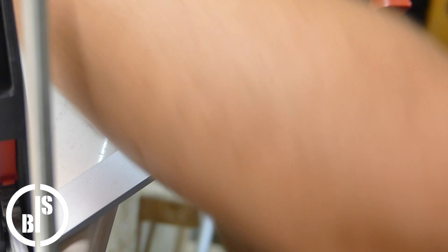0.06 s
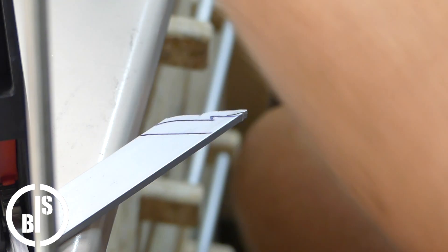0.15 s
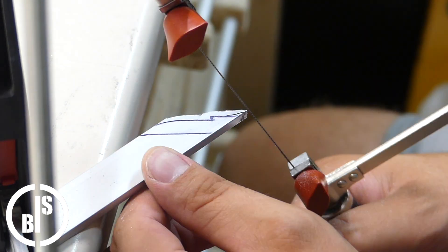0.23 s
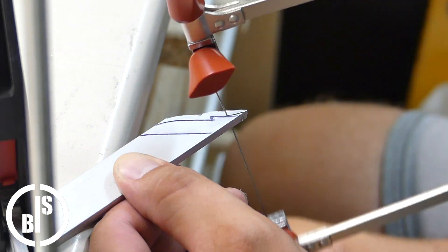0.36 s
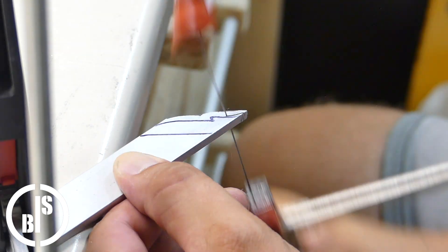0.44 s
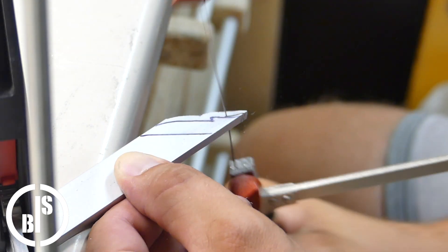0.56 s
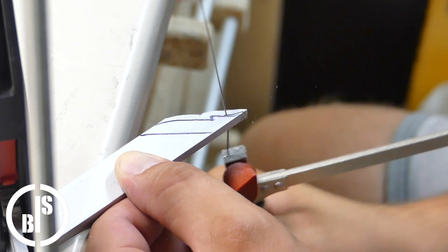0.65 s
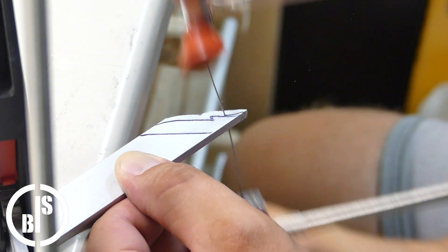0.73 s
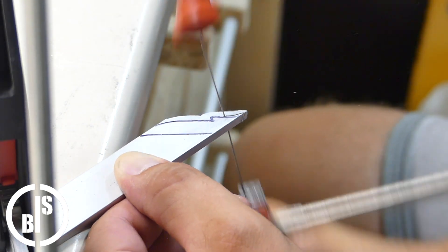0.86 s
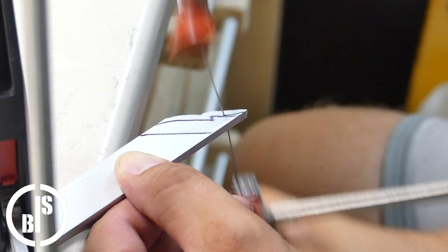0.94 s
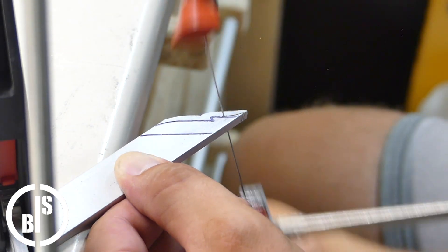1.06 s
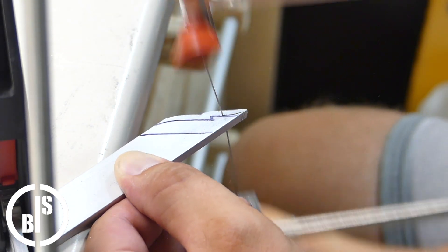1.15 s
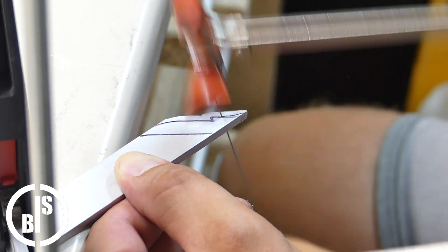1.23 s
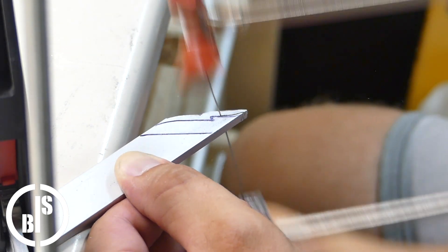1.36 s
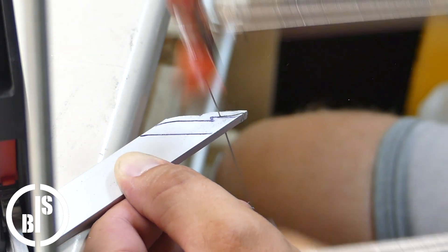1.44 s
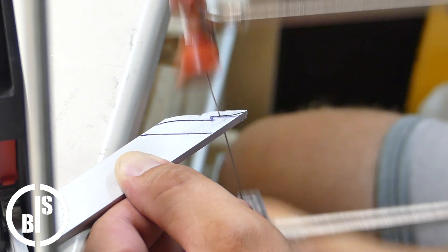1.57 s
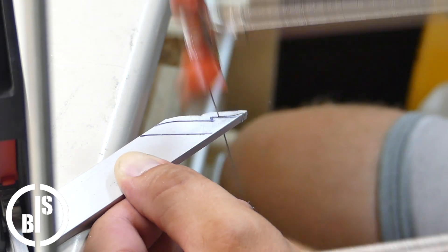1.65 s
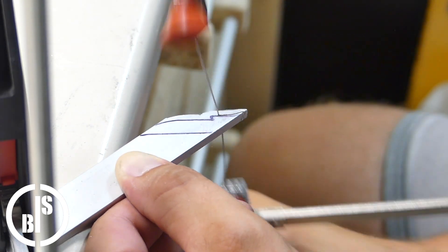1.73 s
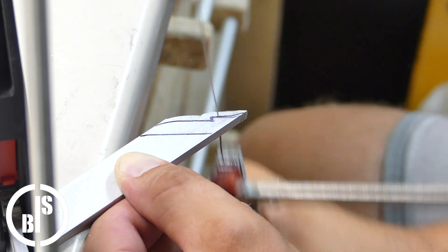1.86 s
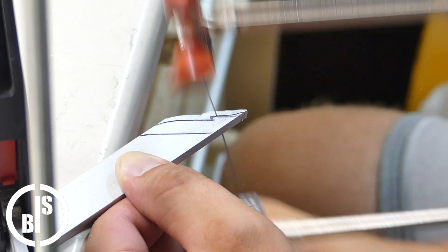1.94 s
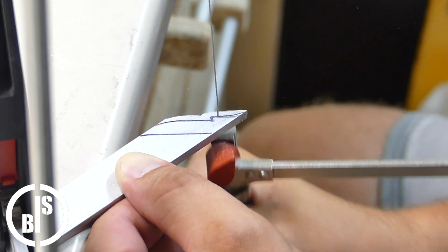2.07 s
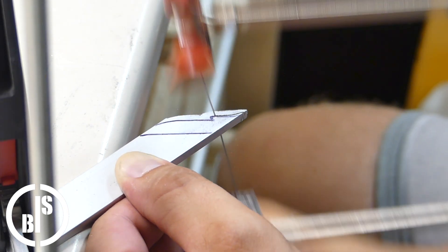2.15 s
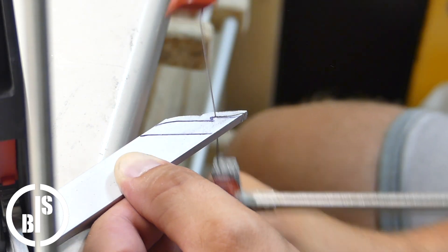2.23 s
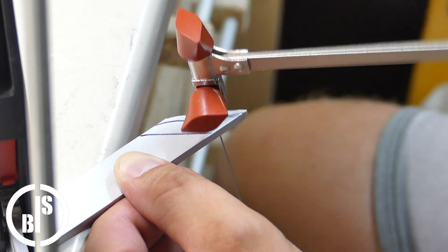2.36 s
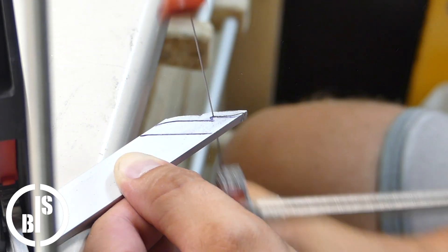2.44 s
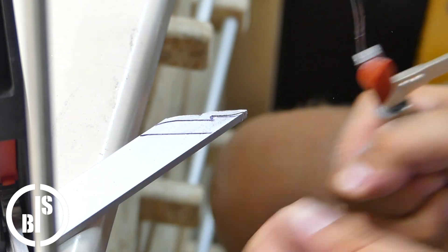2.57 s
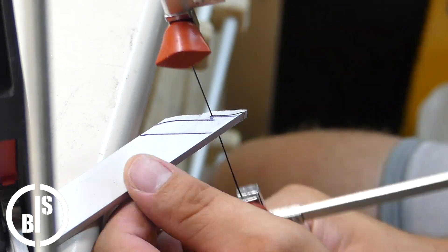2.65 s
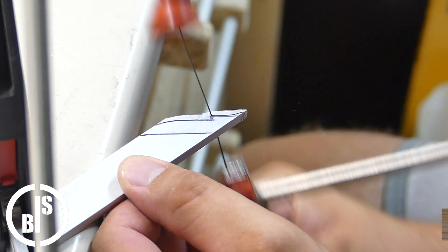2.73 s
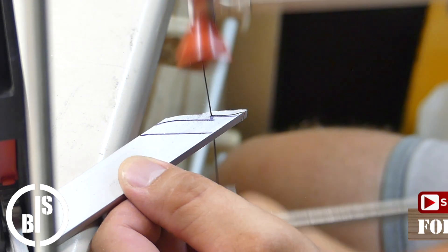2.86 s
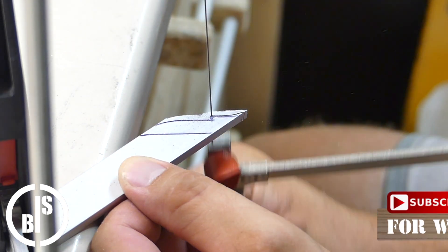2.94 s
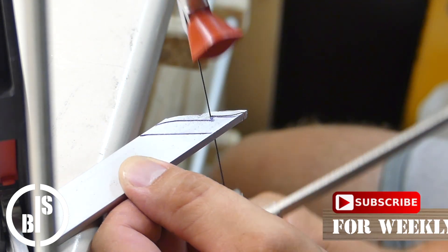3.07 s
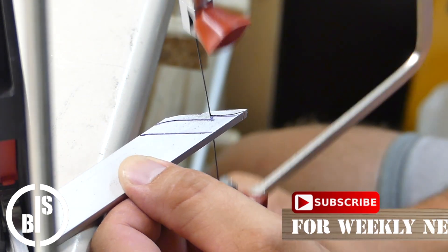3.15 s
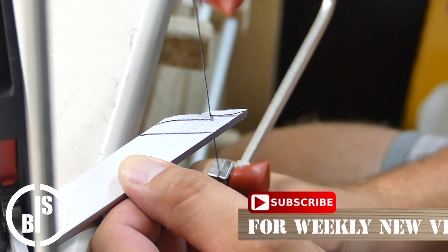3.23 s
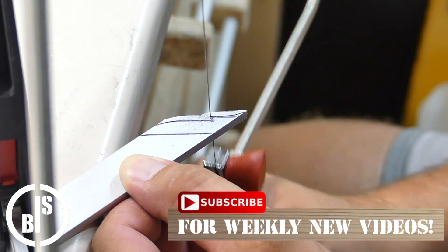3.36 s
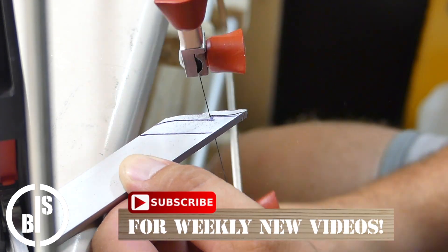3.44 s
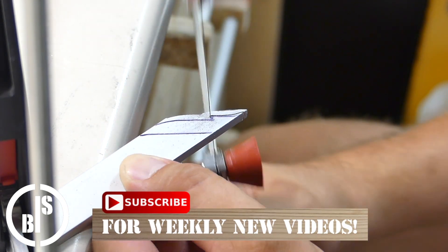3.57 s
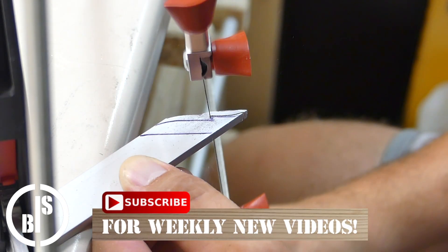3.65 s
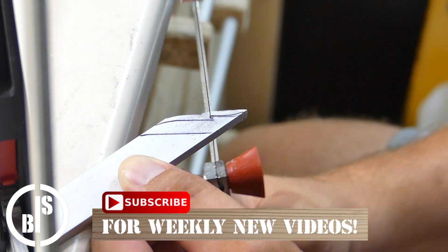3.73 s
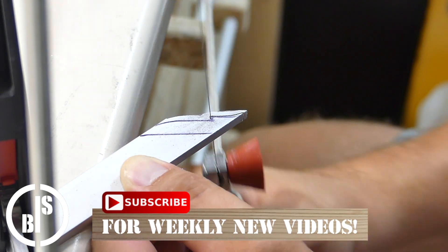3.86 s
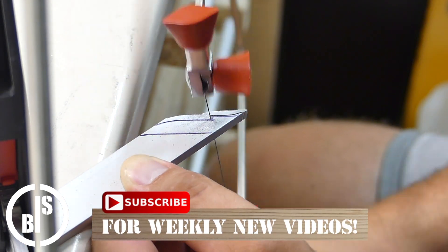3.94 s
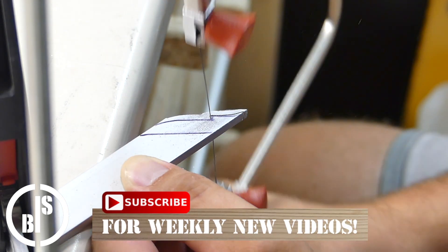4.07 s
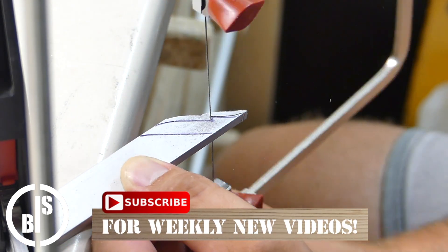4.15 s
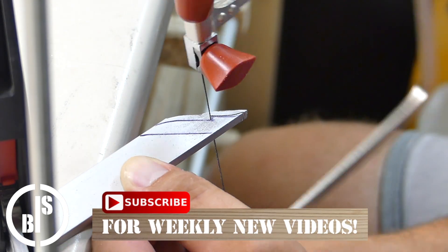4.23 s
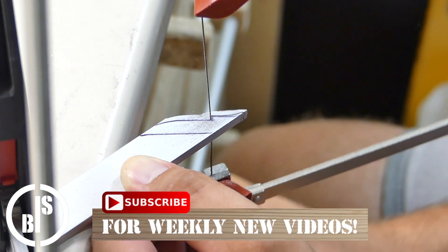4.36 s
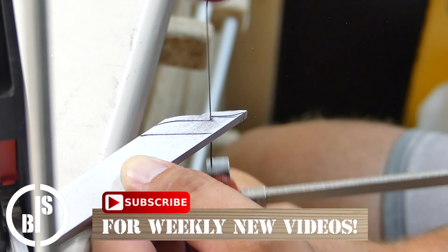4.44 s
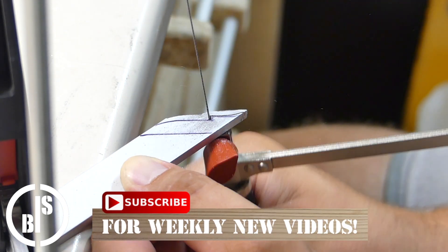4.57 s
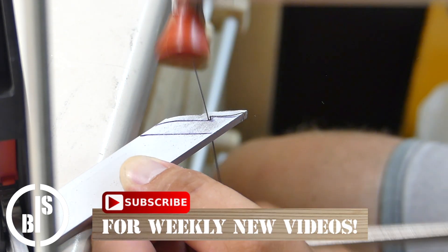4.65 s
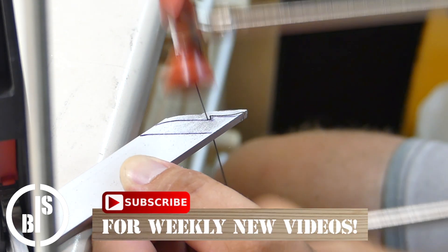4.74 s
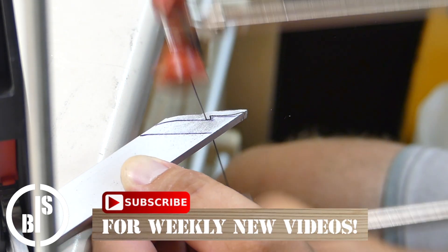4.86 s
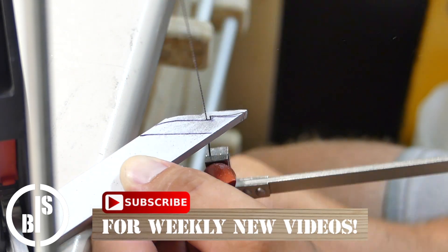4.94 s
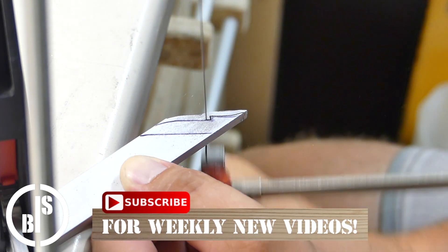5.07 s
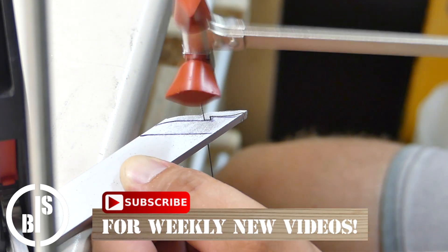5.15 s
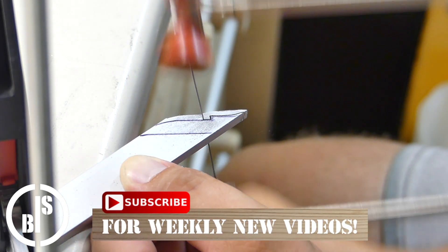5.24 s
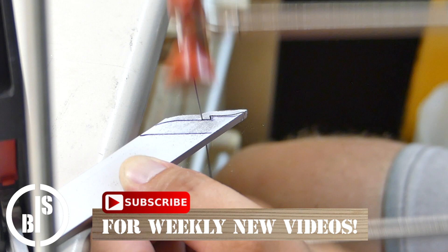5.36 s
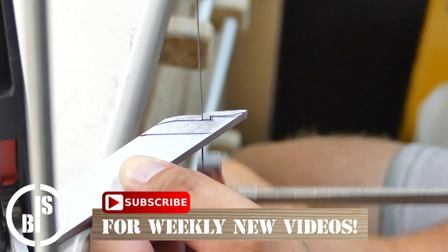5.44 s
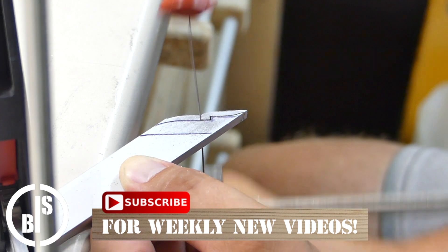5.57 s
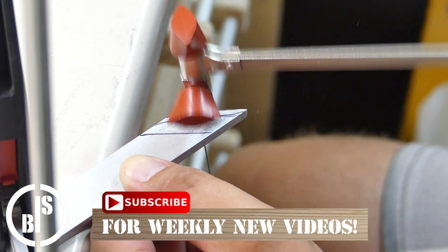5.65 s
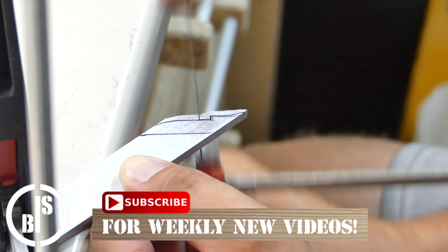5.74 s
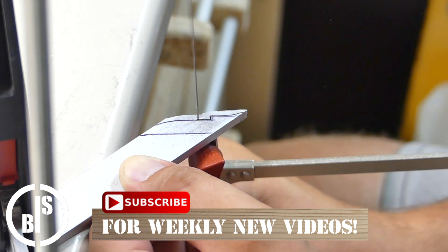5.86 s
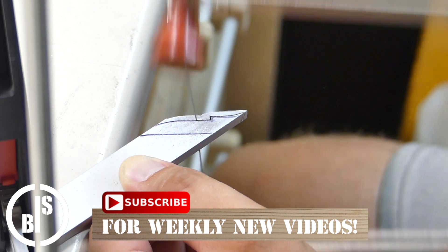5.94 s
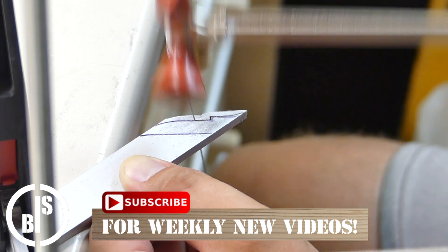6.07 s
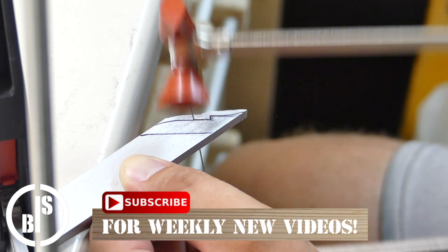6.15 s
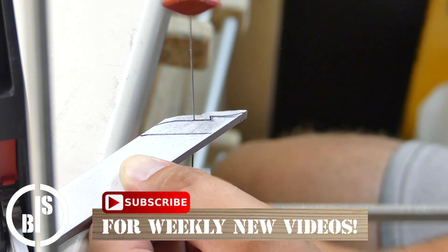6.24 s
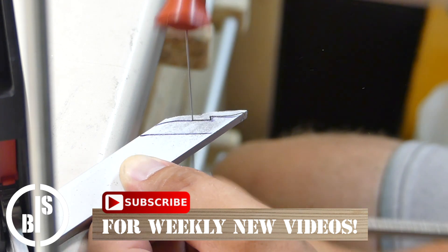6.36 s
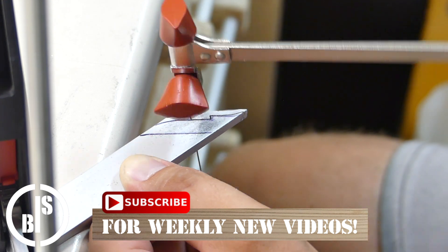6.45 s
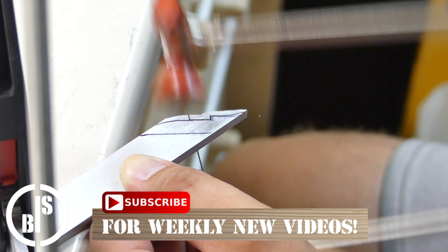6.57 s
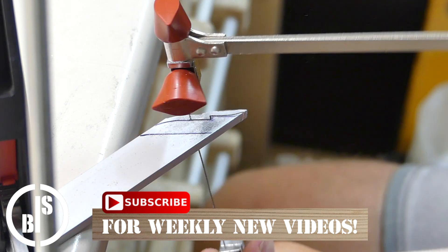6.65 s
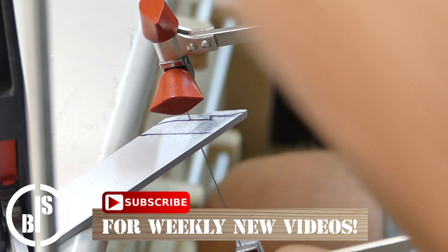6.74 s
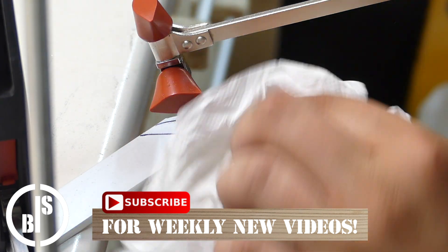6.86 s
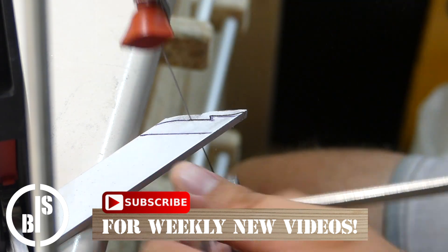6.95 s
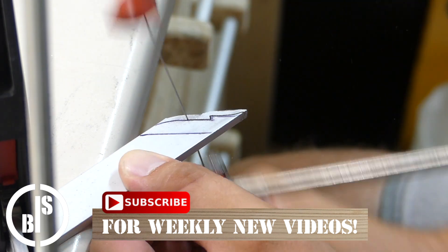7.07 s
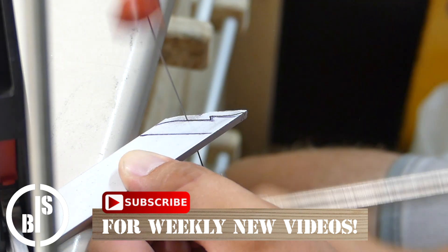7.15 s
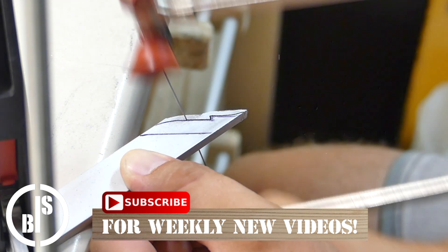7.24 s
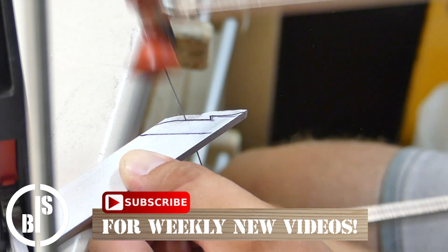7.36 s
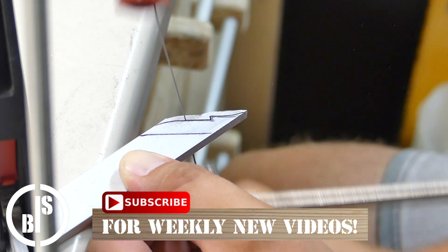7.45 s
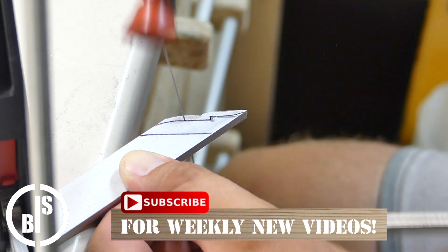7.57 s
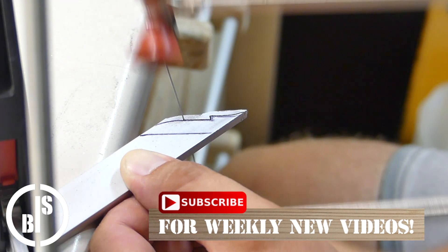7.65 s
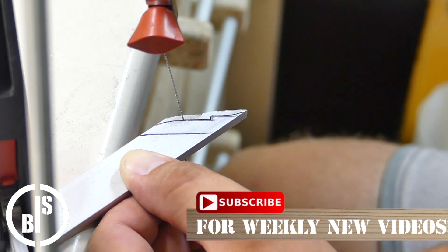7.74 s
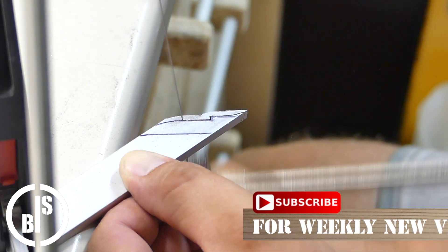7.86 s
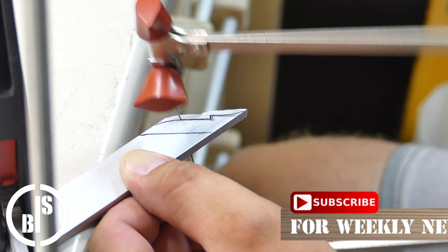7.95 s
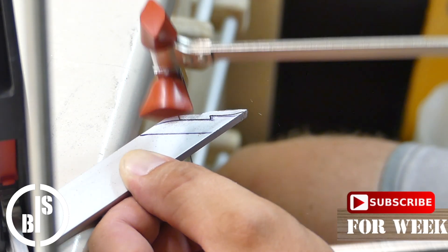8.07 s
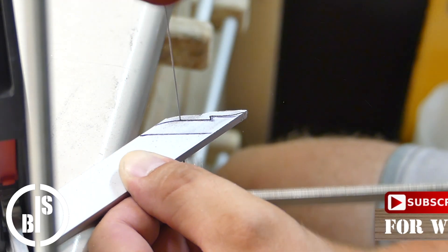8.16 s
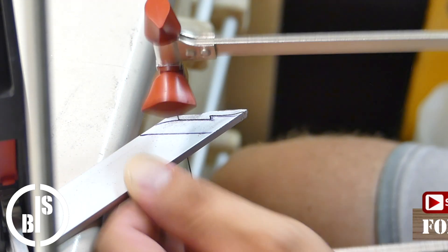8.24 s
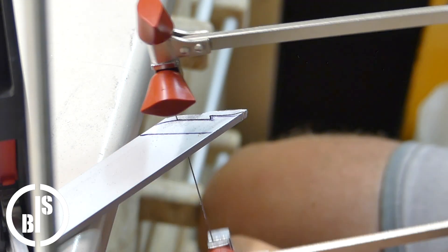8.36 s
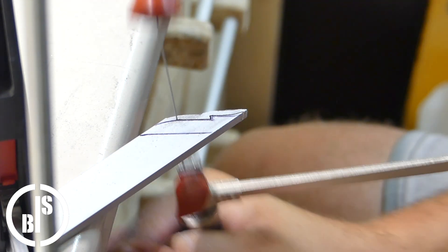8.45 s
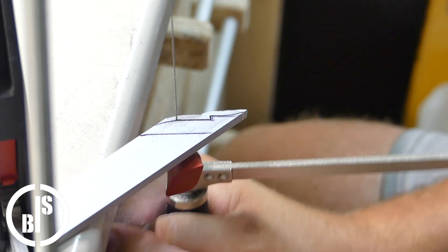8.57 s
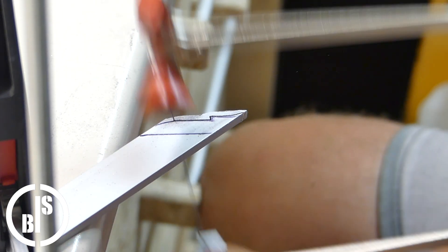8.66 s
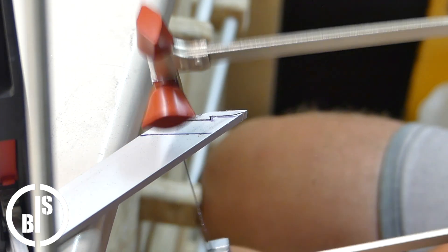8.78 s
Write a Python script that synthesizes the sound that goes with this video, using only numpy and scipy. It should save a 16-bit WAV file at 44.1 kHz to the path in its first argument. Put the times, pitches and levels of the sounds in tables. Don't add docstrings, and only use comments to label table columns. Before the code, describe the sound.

A short squeal and frame knock open over quiet workshop hum, then a fine hand saw rasps through a thin aluminium strip. The sawing is speeded up and chopped into tiny scraps, so it stutters and clicks. Low bench buzz swells as teeth dig in. Brief gaps fall near three seconds, around four and a quarter, and before seven, where the frame knocks. Later strokes sound hissier. Close stereo microphone, small dry room.

```python
import sys
import numpy as np
from scipy import signal
from scipy.fft import rfft, irfft, next_fast_len
from scipy.io import wavfile
from scipy.ndimage import uniform_filter1d

SR = 44100
rng = np.random.default_rng(int(sys.argv[2]) if len(sys.argv) > 2 else 0)


def invert_db(level):
    return 10 ** (np.asarray(level, dtype=float) / 20)


def unload_wav(signal):
    wavfile.write(
        sys.argv[1],
        SR,
        np.round(np.clip(np.atleast_2d(signal).T, -1, 1) * 32767).astype(np.int16),
    )


N = 388499
LONG = next_fast_len(5 * N // 4)
BIN_HZ = np.fft.rfftfreq(LONG, 1 / SR) + 1

# pitch_hz, level_db (per Hz)
AIR = [(18, -45), (30, -34), (87, 3), (497, -1.5), (1920, -21.5), (13900, -28.5), (15000, -25)]
AIR_DB = -74

# start_s, length_s, level_db, pitch_hz, width_hz
BINDS = [(.009, 0.032, -60.5, 2060, 3340), (4.243, 0.021, -52, 2010, 300), (5.012, 0.015, -51, 2820, 900),
         (5.185, 0.014, -47, 1080, 120), (5.193, 0.011, -49, 1300, 120), (5.19, 0.016, -64, 6000, 2000),
         (3.306, 0.015, -57, 594, 700), (5.182, 0.018, -51, 2610, 900), (6.046, 0.009, -58, 5750, 900),
         (6.043, 0.009, -53.5, 3600, 4500), (6.044, 0.0078, -48.5, 1430, 300),
         (6.612, 0.0038, -49.5, 5560, 1500), (7.219, 0.022, -52, 5540, 1300),
         (7.22, 0.011, -47.5, 2420, 600), (7.22, 0.017, -49, 1400, 299.7), (7.221, 0.0069, -49, 3800, 5000),
         (7.225, .006, -56, 3800, 5000), (7.274, .012, -56, 2400, 600), (7.274, 0.021, -62.5, 5700, 1200),
         (6.734, 0.0038, -73, 4000, 7000), (6.739, 0.03, -76, 1840, 250), (.009, 0.023, -76, 5460, 2000)]
BIND_FADE_DB = -5

# start_s, level_db, pitch_hz, t60_s
KNOCKS = [
    (.009, -52, 1450, 0.054),
    (.009, -59, 2970, 0.054),
    (.011, -60, 488, 0.11),
    (.333, -63, 2400, 0.047),
    (.288, -60, 520, 0.091),
    (6.737, -47, 700, 0.042),
    (6.737, -61, 564, 0.041),
    (6.752, -61, 760, .3),
    (6.87, -77, 3000, .4),
]

# period_s, offset_s
HOP = (.0426626, -.0031318)
BLOCK = (.0120603, -.004479)
STEP = (.00267645, -.00044)

# start_s, bench_level_db, bite_db
TOUCHES = [(0, -84, 16), (.008, -61, -6), (0.041, -89, 21), (0.129, -81, 28.5), (.177, -84, 21),
           (.213, -90, 1), (0.287, -66, -6), (0.334, -67, 6), (2.598, -99, 5), (2.637, -97, 32),
           (3.0252, -70.5, -2), (3.074, -54, -1.5), (3.273, -65.5, 7), (3.325, -62.5, -3),
           (4.2656, -93, -4), (6.651, -92, 12), (6.7354, -65, -17), (6.774, -87, 24), (6.808, -81, 24.5),
           (6.907, -83.5, 31.5), (6.9675, -74, 31.5)]
RESUMES_S = [.3714, 2.6864, 3.1566, 3.361, 4.3022, 6.9904]
# hand_turn_s, sag_at_turn_db, bench_level_db, bite_db
FIRST_STROKES = [(.375, 17.5, -42.5, 3.5), (.52, 6, -43.5, 9.5), (0.611, 12.5, -45, 9), (.7, 3.5, -46, 3.5),
                 (.82, 4.5, -45.5, 6), (0.999, 9, -44, 4.5), (1.2, 5, -45.5, 5), (1.39, 9, -46, 4.5),
                 (1.612, 10.5, -44, 4), (1.775, 9, -46, 8), (1.85, 8, -42.5, 1.5), (2.028, 7.5, -45, 3),
                 (2.272, 9.5, -44.5, 2.5), (2.46, 1.5, -45.5, 3.5), (2.58, 8, -48, 3), (2.698, 10, -44, 5),
                 (2.88, -0.5, -45, 4), (3.01, 0, -46, 1), (3.13, -6.5, -48, -0.5), (3.37, 6, -46, 3.5),
                 (3.457, 10, -43, 1.5), (3.531, 7, -45, 5), (3.738, 7.5, -46.5, 1.5), (3.85, 0.5, -45, 2.5),
                 (3.98, 1.5, -45.5, 7.5), (4.11, 2.5, -43, 1.5), (4.245, 8, -43, -0.5)]
# hand_turn_s, sag_at_turn_db, bench_level_db, bite_db
SECOND_STROKES = [(4.32, 6.5, -45.5, 3), (4.397, 3.5, -37.5, -3.5), (4.434, 0.5, -48, -2),
                  (4.473, -0.5, -48, -2), (4.517, 3, -44.5, 3.5), (4.75, -2.5, -45.5, 3.5),
                  (4.98, 3, -47, 0.5), (5.16, 0, -47.5, 2), (5.265, 2.5, -45.5, -2.5),
                  (5.359, 7, -46.5, -2.5), (5.48, 2.5, -47, 0), (5.69, 4, -46.5, -1), (5.92, 4, -49, 1.5),
                  (6.08, -1, -46.5, 1), (6.25, -1, -44.5, -4.5), (6.37, 0.5, -45.5, -4.5),
                  (6.63, 0.5, -46, -4), (6.99, -1.5, -44.5, -0.5), (7.2, 1.5, -46.5, -3),
                  (7.275, 1, -46, -3.5), (7.498, 6, -47, -5), (7.65, 7.5, -45, -1.5),
                  (7.79, 12, -47.5, -3.5), (7.991, 2, -47.5, -9.5), (8.07, 3.5, -49, 1),
                  (8.12, 3, -42.5, -3.5), (8.232, 0, -45.5, -1.5), (8.337, 0, -41, -7.5),
                  (8.59, 2, -44.5, -1.5)]
TURN_S, GLIDE_SHARE = 0.025, 0.43
ARCH_DB = 1
SCRAP_SCATTER_DB, SCATTER_SHARE = 2, 0.4
# level_db (against the bench), sag_share, bite_share, own_scatter_db
PARTS = [
    (-0.5, 0.66, 0.07, 1.5),
    (-9, 0.94, 0.56, 1.4),
    (-18.5, 1.05, 0.83, 0.65),
]

# start_s, bench_deep_db, strip_ring_db, frame_ring_db, blade_sizzle_db,
# top_fizz_db, blade_ring_db, chip_hiss_db
GRIP = [(0, -7.5, 2, 5, 4, 8, 1, 3), (1, -3.5, 0, -0.5, 1, -2, 1, 1.5), (2, -5, -3, -7.5, -3, -8, 0, -4),
        (2.6, -3, 0.5, -10, -15, -7, 2, 2.5), (2.7, 2, 9.5, -3, -20, -2, 2, -4),
        (3.5, -5, 3, -12, -12, 4, 0, -3), (4.3, -6, 5, -3, -9, 6, -1.5, -5), (5, 1, 2.5, -7, 4, 3, -5, -2),
        (5.4, -2, 3.5, -17, 3.5, -1, -6, -7), (5.8, 1.5, -2, -17, -2.5, -1, -16, -2),
        (6.2, 2, -0.5, -11, 1.5, 5, -12, 4), (6.6, 0.5, -3, -3, 8, 8, -3, 8),
        (7, -2.5, 0, -1, 12, 12, 5, 9), (7.6, -2.5, -8, -11, 15, 11, 5, 5),
        (8.05, -3, -5, -4, 22, 21, 7, 16), (8.19, 4, -7, 6, 14, 11, 3, 9), (8.8, 5.5, -8, 7, 16, 10, -1, 3)]
WOBBLE_DB, RETUNE = 1.8, 0.025

# pitch_hz, width_hz, level_db
BENCH = [(82, 290, -32), (158.3, 48, -17), (227.7, 60, -12.5), (278, 42, -18), (337, 87, -12),
         (523.4, 51, 3), (596, 93, -17.5), (698, 79, -8), (760, 260, -13)]
# pitch_hz, width_hz, level_db
BENCH_DEEP = [(408.7, 97, -0.5), (470.7, 67.4, 2.5)]
# pitch_hz, width_hz, level_db
STRIP = [(1080, 770, 6.5), (1107, 52, 4), (1320, 130, 6.5), (1436, 80, 9.5), (1590, 59, 6),
         (1940, 580, 1.5), (2946, 320, -1), (3060, 1115, -3.5), (3265, 90, -3), (3470, 64, -7),
         (3746, 86, 0.5), (4530, 1430, -1)]
# pitch_hz, width_hz, level_db
STRIP_RING = [(2220, 420, -3.5), (2384, 270, 8.5), (2614, 54, 8), (2714, 59, 1.5), (2818, 64, 6)]
# pitch_hz, width_hz, level_db
FRAME_RING = [(3600, 120, 0.72), (3690, 476, 0.46)]
# pitch_hz, width_hz, level_db
BLADE = [(4626, 1130, 8), (5280, 2070, -1)]
# pitch_hz, width_hz, level_db
SIZZLE = [(9680, 410, -7), (9840, 1440, -4.5), (10630, 2100, -20), (11640, 1500, -17.5)]
# pitch_hz, width_hz, level_db
FIZZ = [(12100, 1400, -15), (13400, 1900, -11.5), (14400, 1400, -37)]
# pitch_hz, width_hz, level_db
BLADE_RING = [(6020, 420, 4), (6560, 1050, 0)]
# pitch_hz, width_hz, level_db
CHIPS = [(8000, 5000, -5.5), (10900, 3000, -22)]
TOOTH_HZ = 520
RIPPLE_DB = 1.3

# pitch_hz, level_db
SHOP_DB = [(100, -14), (300, -18), (600, -13), (1100, -4.5), (2200, -9), (14000, -17)]
ECHO_T60_S = 0.045
LEFT_DB = [-1.36, 1.04, 0]
SPREAD_DB = [-24, -19, -8.5]

# start_s, notch_hz, bounce_share
BOUNCE = [(0, 7800, 0.04), (4.6, 8600, 0.25), (5, 8800, 0.37), (5.5, 7800, 0.04), (6, 7300, 0.1),
          (6.3, 7600, 0.16), (7, 8000, 0.3), (7.6, 8000, .45), (8.8, 8000, 0.3)]
# start_s, pitch_hz, depth_share
DEAD = [(0, 7200, 0.6), (4.5, 7200, 0.6), (4.8, 8800, 0.4), (5.1, 8499, .85), (5.6, 7300, .85),
        (6.1, 7100, .7), (6.5, 7170, 0.1)]

# start_s, treble_level_db
JOINTS = [(0.384, -75), (.428, -79), (0.589, -70), (.984, -70), (1.018, -68), (2.009, -71), (2.721, -66),
          (3.444, -72), (4.396, -68), (4.868, -70), (5.893, -72), (6.183, -59), (8.656, -54), (0.681, -65),
          (.72, -69), (1.066, -61), (1.106, -66), (1.322, -62), (1.482, -58), (1.742, -62), (1.934, -55),
          (2.082, -68), (2.347, -63), (2.418, -57), (8.129, -75), (2.514, -64), (2.6, -64.5), (2.938, -61),
          (3.203, -59), (3.795, -63), (3.865, -67), (3.877, -58.5), (3.925, -60), (3.963, -59),
          (4.133, -72), (4.468, -60), (4.517, -59), (4.567, -69), (4.686, -61), (5.243, -58), (5.292, -65),
          (5.328, -60), (5.422, -61), (5.758, -65), (6.004, -67), (6.049, -73), (6.23, -54.5), (6.269, -64),
          (6.4, -60), (6.437, -62), (6.564, -58), (6.969, -70), (7.297, -62), (7.33, -69), (7.424, -58),
          (7.581, -67), (7.678, -59), (7.927, -57), (8.401, -51), (8.634, -62)]
JOINT_STEP_DB, JOINT_S = 21, 0.00017

# peak_s, peak_db, pitch_hz
DIGS = [(0.451, -38.5, 443), (0.496, -34.5, 443), (0.563, -37, 557), (0.602, -39, 483), (0.661, -35, 525),
        (0.695, -35.5, 490), (0.725, -39, 415), (0.77, -37, 510), (0.893, -32.5, 454), (0.953, -36, 483),
        (1.068, -38, 540), (1.103, -36.5, 525), (1.147, -40.5, 454), (1.223, -37, 450), (1.303, -35.5, 534),
        (1.325, -38.5, 460), (1.488, -33, 400), (1.532, -34.5, 520), (1.656, -34.5, 482), (1.696, -39, 520),
        (1.727, -39, 560), (1.894, -34, 535), (1.915, -33, 480), (1.934, -31.5, 537), (1.959, -38, 560),
        (1.982, -34.5, 513), (2.153, -34.5, 527), (2.192, -37.5, 500), (2.33, -36.5, 407),
        (2.361, -39.0, 545), (2.401, -34.5, 490), (2.5, -33.5, 530), (2.751, -39.5, 420),
        (2.774, -37.5, 497), (2.815, -38, 440), (2.835, -36, 490), (2.919, -36, 475), (2.941, -38, 566),
        (2.967, -34, 480), (3.168, -34, 521), (3.197, -35.5, 513), (3.249, -34, 510), (3.422, -34.5, 458),
        (3.571, -34, 496), (3.598, -34.5, 477), (3.617, -37.5, 520), (3.682, -39, 503), (3.712, -36.5, 506),
        (3.821, -34.5, 494), (3.878, -38, 474), (3.928, -32.5, 494), (3.966, -36.5, 560), (4.039, -33, 540),
        (4.057, -35.5, 513), (4.105, -34, 505), (4.15, -34, 505), (4.17, -34, 507), (4.211, -33, 524.4),
        (4.408, -34.5, 490), (4.428, -36, 475)]
# peak_s, peak_db, pitch_hz
LATE_DIGS = [(4.536, -32.5, 484.7), (4.576, -37.5, 460), (4.605, -34.5, 465), (4.633, -36.5, 480),
             (4.653, -41, 503), (4.677, -33, 500), (4.705, -34, 520), (4.769, -36, 513), (4.794, -32, 492),
             (4.823, -35.5, 483), (4.844, -35, 490), (4.886, -37, 453), (4.922, -34, 510),
             (5.017, -32, 474), (5.046, -40.5, 530), (5.109, -39.5, 416), (5.189, -44, 507),
             (5.225, -37, 500), (5.44, -37.5, 507), (5.761, -35.5, 540.2), (6.056, -33, 506),
             (6.107, -30, 483), (6.151, -34, 447), (6.232, -42, 479), (6.278, -34.5, 460),
             (6.308, -37, 535), (6.382, -36, 500), (6.407, -35.5, 428), (6.453, -32, 496),
             (6.521, -29.5, 493), (6.574, -36.5, 465), (6.617, -40, 444), (7.002, -38, 513),
             (7.029, -36.5, 466), (7.053, -33, 460), (7.092, -35.5, 434), (7.117, -37, 402),
             (7.155, -34, 496), (7.322, -39, 474), (7.347, -36, 510), (7.378, -34, 450),
             (7.725, -41.5, 583), (7.968, -35.5, 490), (8.143, -40, 544), (8.167, -36, 453),
             (8.186, -33, 540), (8.215, -31, 454), (8.315, -33.5, 501), (8.366, -37.5, 508),
             (8.397, -32.5, 444), (8.443, -38.5, 470), (8.47, -34, 456), (8.503, -41, 467),
             (8.529, -33, 457), (8.553, -37, 453), (8.574, -32, 470), (8.644, -33, 470),
             (8.726, -36.5, 480), (8.749, -33.5, 517), (8.8, -34, 456)]
# peak_s, peak_db, pitch_hz
LIGHT_DIGS = [(.975, -44, 480), (1.236, -34, 500), (1.632, -41.5, 500), (4.375, -40, 393),
              (5.109, -41, 520), (5.25, -37, 480), (5.31, -38, 500), (5.424, -39, 506), (5.475, -39, 486),
              (6.008, -37.5, 500), (6.122, -39, 476), (7.305, -38, 520), (7.391, -38, 500),
              (7.461, -40, 500), (8.1, -38.5, 479.7)]
DIG_S, DIG_DUCK, DIG_RING_DB, DIG_ROUGH_DB = 0.0048, 0.72, -2, -12.5
BENCH_CAP_DB = 4
BENCH_TOP_HZ = 2680


def unit(x):
    return x / np.sqrt(np.mean(x ** 2))


def walk(rate):
    hold = int(SR / rate)
    held = np.repeat(rng.standard_normal(LONG // hold + 1), hold)
    return 1.2 * uniform_filter1d(held, hold)[:LONG]


def curve(hz, table):
    point_hz, db = np.transpose(table)
    return invert_db(np.interp(np.log(hz), np.log(point_hz), db))


def splices():
    def snap(s, grid):
        period, offset = grid
        return np.round((s - offset) / period) * period + offset

    hops = HOP[1] + HOP[0] * np.arange(1, N / SR / HOP[0])
    regular = snap(snap(hops, BLOCK), STEP)
    edges = np.concatenate([np.array(TOUCHES)[:, 0], RESUMES_S, np.array(JOINTS)[:, 0]])
    clear = np.abs(regular[:, None] - edges).min(axis=1) > HOP[0] / 2
    return np.sort(np.append(edges, regular[clear]))


def scrap_at(starts, samples):
    return np.maximum(np.searchsorted(starts * SR, samples, side="right") - 1, 0)


def air():
    colour = curve(np.fft.rfftfreq(N, 1 / SR) + 1, AIR)
    mid, side = (irfft(rfft(rng.standard_normal(N)) * colour, N) for _ in range(2))
    return AIR_GAIN * unit(np.array([mid, mid]) + 1.27 * side * np.array([[1], [-1]]))


AIR_GAIN = invert_db(AIR_DB)


def binds():
    out = np.zeros(N)
    for s, length, db, hz, width in BINDS:
        t = np.arange(int(length * SR)) / SR
        band = signal.butter(2, [hz - width / 2, hz + width / 2], "band", fs=SR, output="sos")
        squeal = unit(signal.sosfilt(band, rng.standard_normal(4096)))[-len(t):]
        shape = np.minimum(t * 2000, 1) * invert_db(BIND_FADE_DB * t / length)
        out[int(s * SR):][:len(t)] += invert_db(db) * squeal * shape
    return out


def knocks():
    out, starts = np.zeros(N), splices()
    for s, db, hz, t60 in KNOCKS:
        stop = starts[starts > s + .01][0]
        t = np.arange(int((stop - s) * SR)) / SR
        ring = np.sin(2 * np.pi * hz * t + 0.37) * 1000. ** (-t / t60)
        out[int(s * SR):][:len(t)] += invert_db(db) * ring
    return out


def effort(starts):
    strokes, touches = np.array(FIRST_STROKES + SECOND_STROKES), np.array(TOUCHES)
    middle = (starts + np.append(starts[1:], N / SR)) / 2

    now = np.arange(0, N, 64) / SR
    centre = middle[np.maximum(np.searchsorted(starts, now, side="right") - 1, 0)]
    moment = centre + GLIDE_SHARE * (now - centre)
    sag = np.exp(-.5 * ((moment[:, None] - strokes[:, 0]) / TURN_S) ** 2) @ strokes[:, 1]
    along = np.interp(moment, strokes[:, 0], np.arange(len(strokes))) % 1
    sag = np.repeat(sag + ARCH_DB * (2 * along - 1) ** 2, 64)[:N]

    def last(times):
        return np.maximum(np.searchsorted(times, middle) - 1, 0)

    touch = touches[last(touches[:, 0])]
    resumed = np.append(-1, RESUMES_S)
    idle = touch[:, 0] > resumed[last(resumed)]
    level, bite = np.where(idle, touch[:, 1:].T, strokes[last(strokes[:, 0]), 2:].T)

    chance = rng.standard_normal((len(PARTS) + 1, len(starts))) * ~idle * SCATTER_SHARE
    scrap = scrap_at(starts, np.arange(N))
    levels = []
    for (db, of_sag, of_bite, own_db), own in zip(PARTS, chance[1:]):
        held = level + db + of_bite * bite + SCRAP_SCATTER_DB * chance[0] + own_db * own
        levels.append(held[scrap] - of_sag * sag * ~idle[scrap])
    return levels


def teeth(wander, scatter_db, grit_db, patchy_db):
    phase = np.cumsum(TOOTH_HZ * np.exp(0.32 * walk(25) + wander * walk(700))) / SR
    size = invert_db(scatter_db * rng.exponential(size=LONG)) * rng.choice([1., -.4], LONG)
    catches = np.diff(np.floor(phase), prepend=0) * size
    grit = rng.standard_normal(LONG) * invert_db(1.08 * walk(900))
    return rfft((unit(catches) + invert_db(grit_db) * unit(grit)) * invert_db(patchy_db * walk(70)))


def body(modes):
    f = BIN_HZ[::8]
    power, swing = 0, 0
    for k, (hz, width, db) in enumerate(modes):
        ring = invert_db(db) * (1j * f * width / (hz ** 2 - f ** 2 + 1j * f * width)) ** 2
        power = power + np.abs(ring) ** 2
        swing = swing + (-1) ** k * ring
    return np.repeat(np.sqrt(power) * swing / np.abs(swing), 8)[:len(BIN_HZ)]


def ripple(modes):
    rough = np.clip(walk(55)[:len(BIN_HZ)], -1.6, 1.6)
    return invert_db(RIPPLE_DB * rough * (modes[0][0] > 1000) * (1 + BIN_HZ / 12000))


def shop():
    t = np.arange(SR // 4) / SR
    spray = rng.standard_normal(len(t)) + 0.64 * rng.standard_normal((2, len(t)))
    echo = spray * 1000. ** (-t / ECHO_T60_S) * (t > .002)
    echo = echo / np.sqrt(np.sum(echo ** 2) / 2)
    return curve(BIN_HZ, SHOP_DB) * rfft(echo, LONG) * np.array([[1.2], [-.8]])


def saw():
    echo = shop()
    heavy = teeth(wander=.4, scatter_db=2.0, grit_db=2.5, patchy_db=2.5)
    fine = teeth(wander=.4, scatter_db=-0.5, grit_db=11.0, patchy_db=3.0)
    groups = [(heavy, [BENCH, BENCH_DEEP]),
              (0.56 * heavy + fine, [STRIP, STRIP_RING, FRAME_RING]),
              (fine, [BLADE, SIZZLE, FIZZ, BLADE_RING, CHIPS])]
    for (force, sets), left_db in zip(groups, LEFT_DB):
        heard = force * (1 + echo) * invert_db([[left_db / 2], [-left_db / 2]])
        rings = [irfft(heard * body(modes) * ripple(modes), LONG) for modes in sets]
        yield np.array([np.roll(ring, k * SR // 20, axis=1) for k, ring in enumerate(rings)])


def retuned(ring, read, since_splice, scrap):
    shift = RETUNE * rng.standard_normal(scrap.max() + 1)[scrap]
    slid = np.clip(read + since_splice * shift, 0, LONG - 2)
    whole = slid.astype(int)
    return ring[:, whole] + (slid - whole) * (ring[:, whole + 1] - ring[:, whole])


def bounced(x):
    now = np.arange(N)
    s, notch_hz, share = np.transpose(BOUNCE)
    place = now - SR / np.interp(now / SR, s, notch_hz)
    late = np.array([np.interp(place, now, side) for side in x])
    return x - np.interp(now / SR, s, share) * late


def deadened(x):
    now = np.arange(N) / SR
    s, hz, depth = np.transpose(DEAD)
    turn = np.exp(2j * np.pi * np.cumsum(np.interp(now, s, hz)) / SR)

    def near(v):
        return uniform_filter1d(uniform_filter1d(v, size=60), size=60)

    band = near(x * turn.real) * turn.real + near(x * turn.imag) * turn.imag
    return x - 2 * np.interp(now, s, depth) * band


def steady(x, db):
    swing = np.sqrt(uniform_filter1d(np.mean(x ** 2, axis=0), size=300) + 1e-18)
    return x / (1 + (swing / invert_db(db + BENCH_CAP_DB)) ** 4) ** .25


def joints():
    out, t = np.zeros(N), np.arange(200) / SR
    for (s, db), sign in zip(JOINTS, rng.choice([-1, 1], len(JOINTS))):
        out[int(s * SR):][:len(t)] += sign * invert_db(db + JOINT_STEP_DB) * np.exp(-t / JOINT_S)
    return out


def digs():
    out, t = np.zeros((3, N + 2000)), np.arange(-1000, 1000) / SR
    starts = np.append(splices(), N)
    for s, db, hz in DIGS + LATE_DIGS + LIGHT_DIGS:
        turn, stretch = rng.random(2)
        k = np.searchsorted(starts, s)
        inside = 1. * (s + t >= starts[k - 1]) * (s + t < starts[k])
        swell = np.exp(-.5 * (t / DIG_S / (0.69 + .5 * stretch)) ** 2) * uniform_filter1d(inside, size=30)
        strength = invert_db(db) * swell
        ring = strength * np.sin(2 * np.pi * (hz * t + turn))
        out[:, int(s * SR) - 1000:][:, :len(t)] += [ring, strength, swell]
    return out[0, :N], out[1, :N], np.minimum(out[2, :N], 1)


def scene():
    starts, grip, now = splices(), np.array(GRIP), np.arange(N)
    scrap = scrap_at(starts, now)
    read = now + rng.integers(0, LONG - N, len(starts))[scrap]

    wobble = WOBBLE_DB * rng.standard_normal((len(grip[0]) - 1, len(starts)))
    wobble[3:] *= .5
    gains = [invert_db(np.interp(now / SR, grip[:, 0], db) + w[scrap]) for db, w in zip(grip[:, 1:].T, wobble)]
    deep, ring, frame, sizzle, fizz, taut, chips = gains

    bench, strip, blade = saw()
    shifted = retuned(strip[1], read, now - starts[scrap] * SR, scrap)
    bench, strip, blade = (parts[:, :, read] for parts in (bench, strip, blade))
    bench = bench[0] + deep * bench[1]
    strip = strip[0] + ring * shifted + frame * strip[2]
    blade = blade[0] + sizzle * blade[1] + fizz * blade[2] + taut * blade[3] + chips * blade[4]
    blade = deadened(bounced(blade))

    levels, out = effort(starts), []
    for x, db, spread_db in zip((bench, strip, blade), levels, SPREAD_DB):
        power = np.bincount(scrap, np.mean(x ** 2, axis=0)) / np.maximum(np.bincount(scrap), 1)
        x = x / np.sqrt(power)[scrap]
        spread = invert_db(spread_db) * np.roll(x[0], SR // 3) * np.array([[1], [-1]])
        out.append(invert_db(db) * (x + spread))
    bench, strip, blade = out

    dig, strength, taken = digs()
    bench = steady(bench, levels[0]) * (1 - DIG_DUCK * taken + strength * invert_db(DIG_ROUGH_DB - levels[0]))
    dull = signal.butter(1, BENCH_TOP_HZ, fs=SR, output="sos")
    bench = signal.sosfiltfilt(dull, bench + invert_db(DIG_RING_DB) * dig)
    return bench + joints() + strip + blade + binds() + knocks() + air()


def band_limit(x):
    return signal.sosfilt(signal.butter(12, 16030, fs=SR, output="sos"), x)


def record(dry):
    trimmed = signal.sosfilt(signal.ellip(8, .2, 50, 15650, fs=SR, output="sos"), dry)
    return band_limit(trimmed)


dry = scene()
out = record(dry)
unload_wav(out)
```